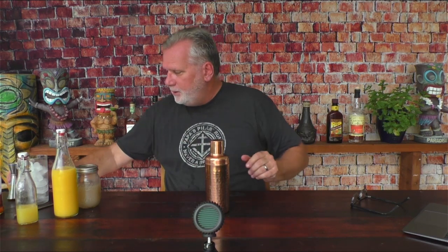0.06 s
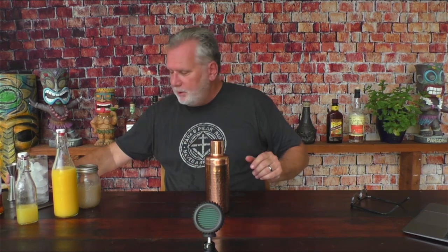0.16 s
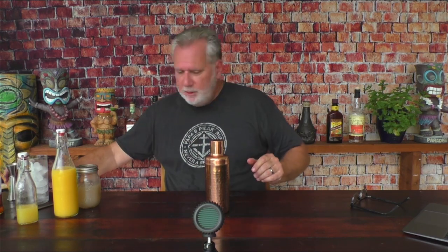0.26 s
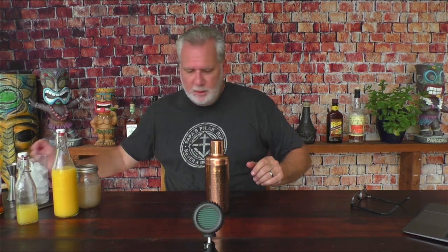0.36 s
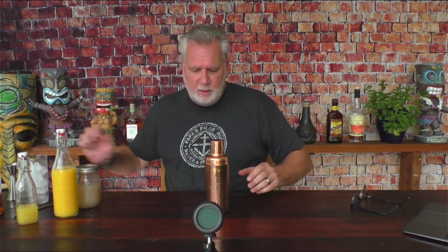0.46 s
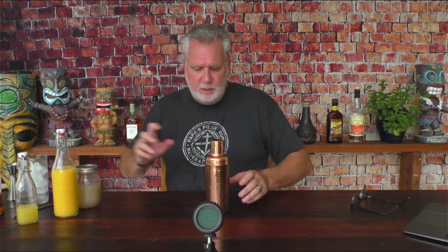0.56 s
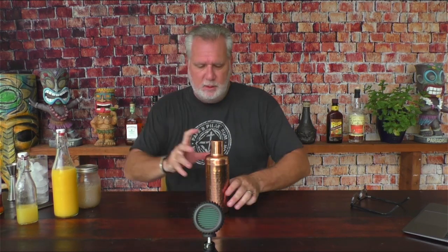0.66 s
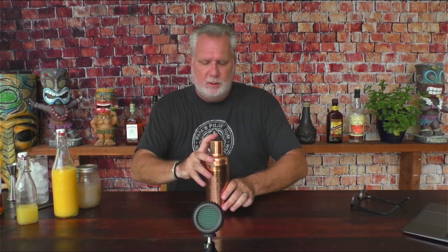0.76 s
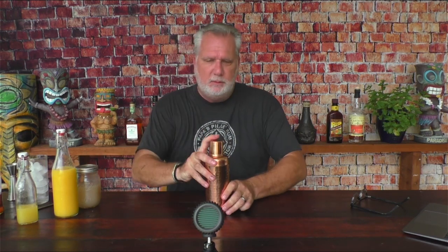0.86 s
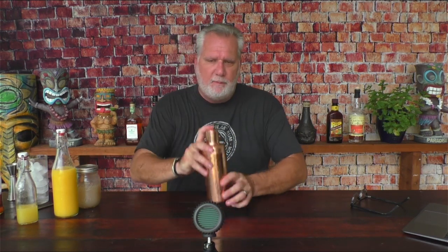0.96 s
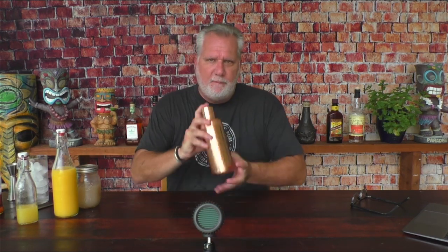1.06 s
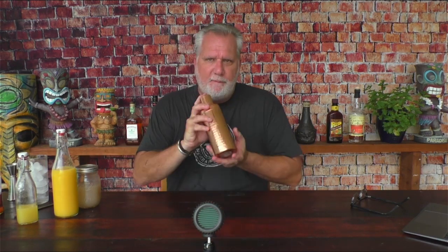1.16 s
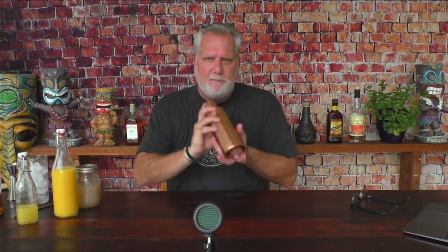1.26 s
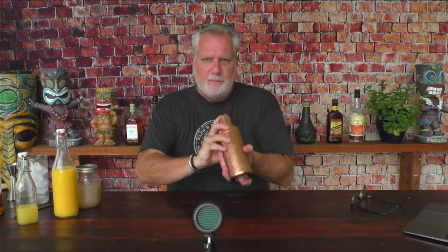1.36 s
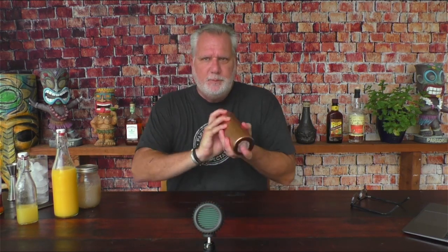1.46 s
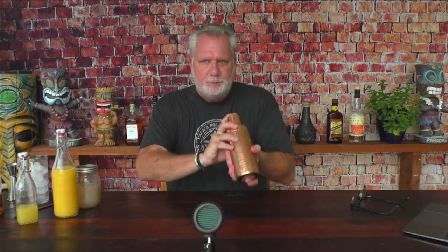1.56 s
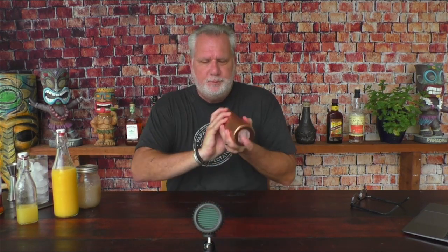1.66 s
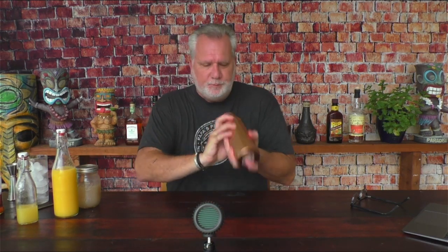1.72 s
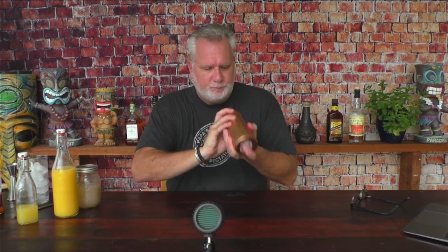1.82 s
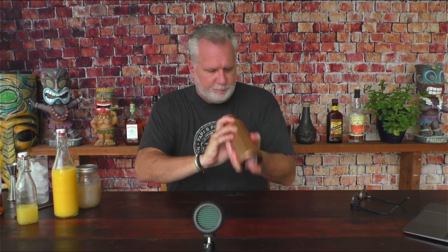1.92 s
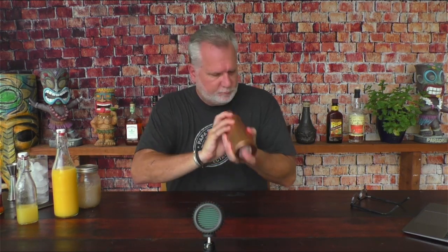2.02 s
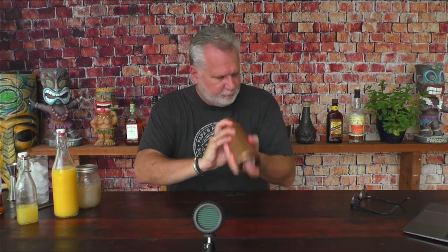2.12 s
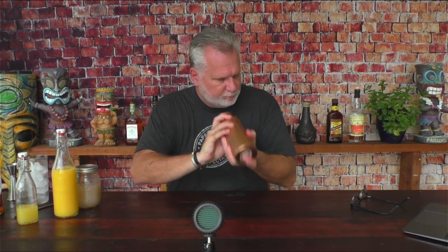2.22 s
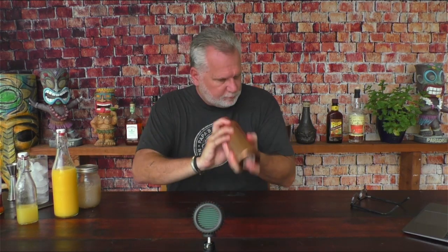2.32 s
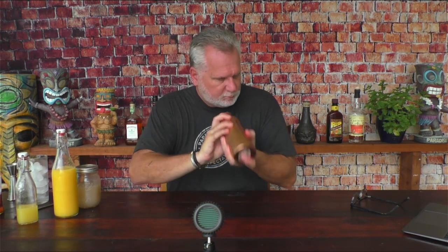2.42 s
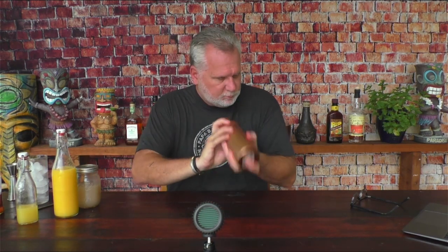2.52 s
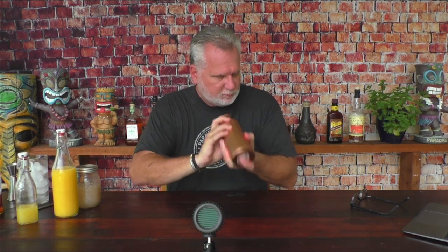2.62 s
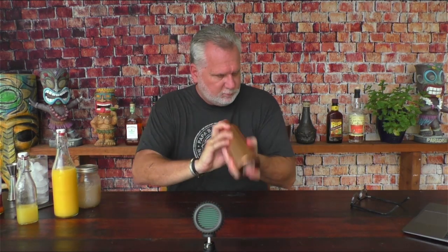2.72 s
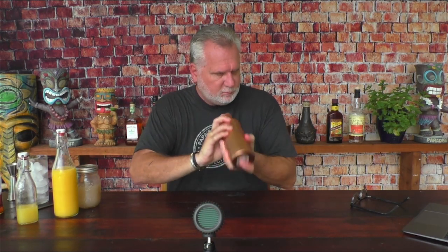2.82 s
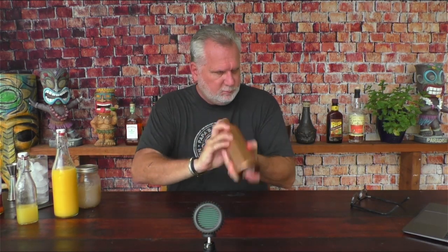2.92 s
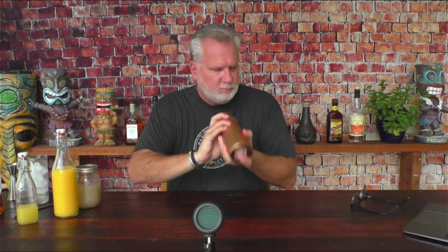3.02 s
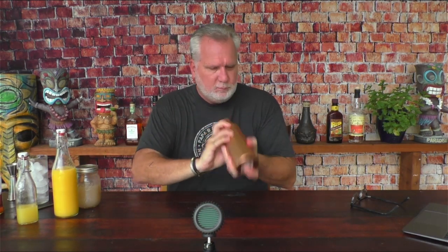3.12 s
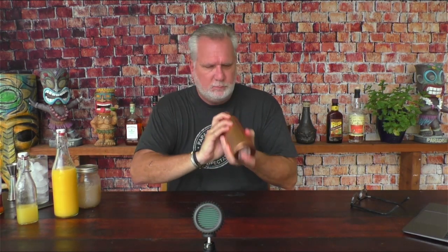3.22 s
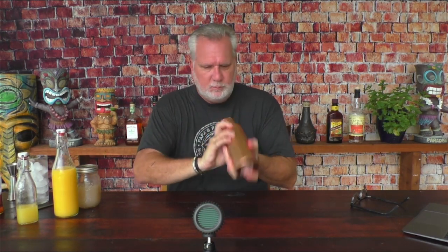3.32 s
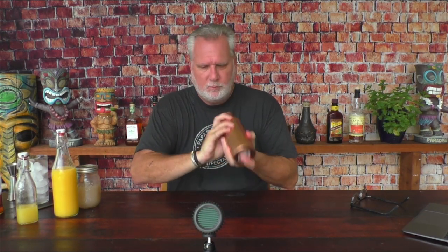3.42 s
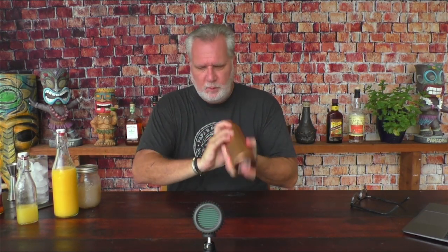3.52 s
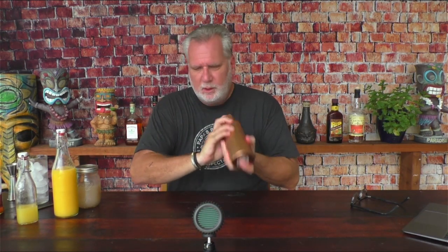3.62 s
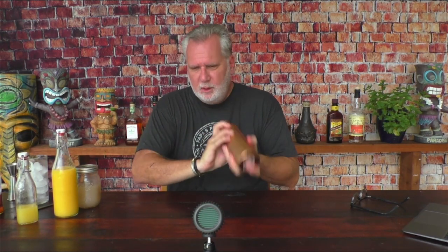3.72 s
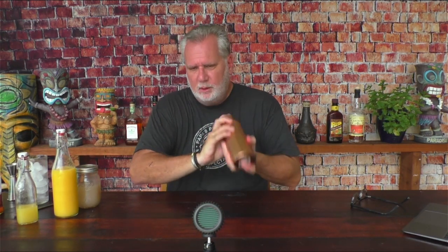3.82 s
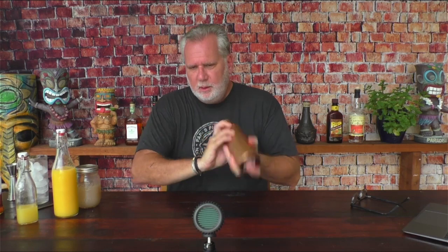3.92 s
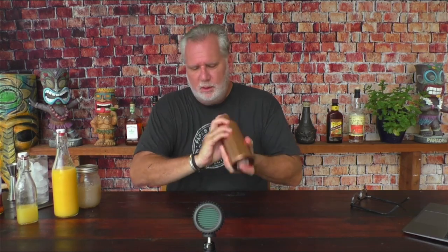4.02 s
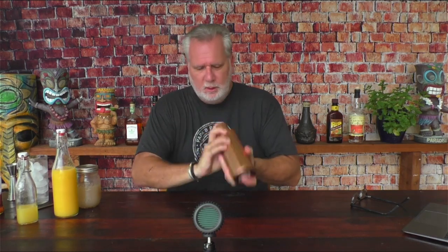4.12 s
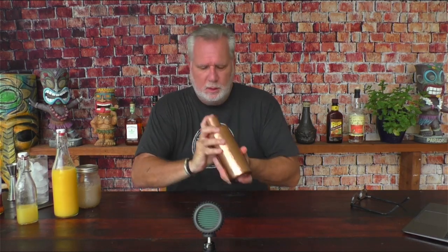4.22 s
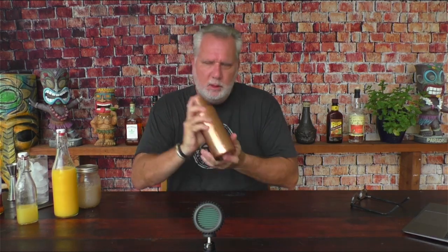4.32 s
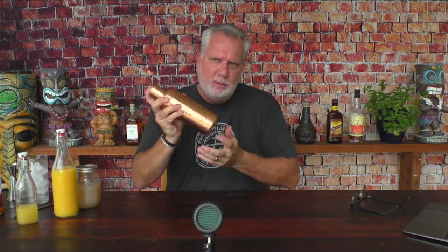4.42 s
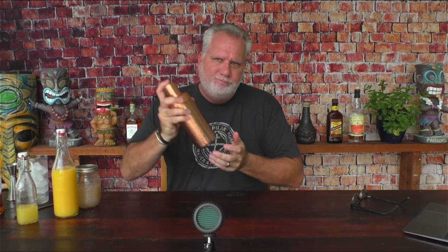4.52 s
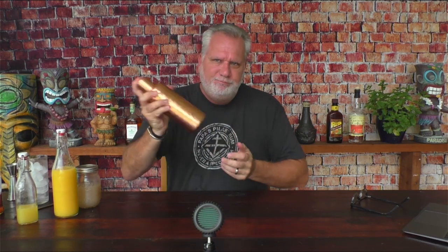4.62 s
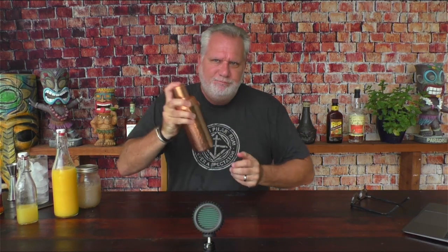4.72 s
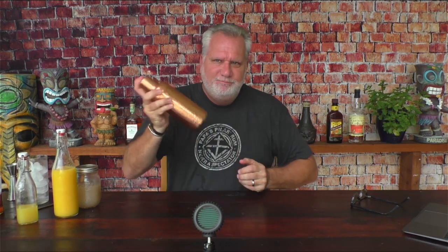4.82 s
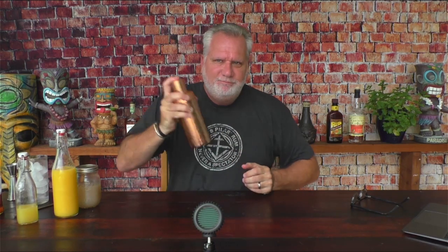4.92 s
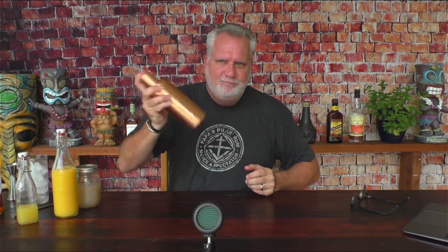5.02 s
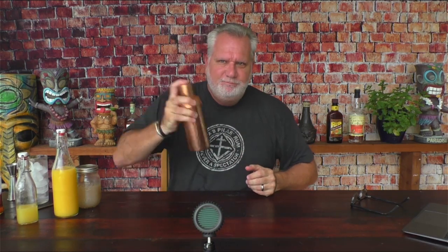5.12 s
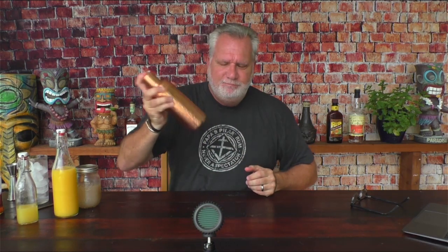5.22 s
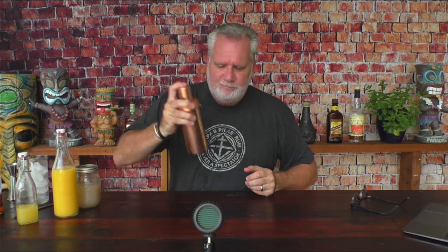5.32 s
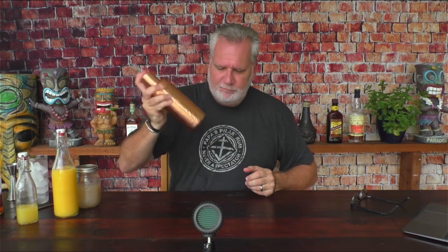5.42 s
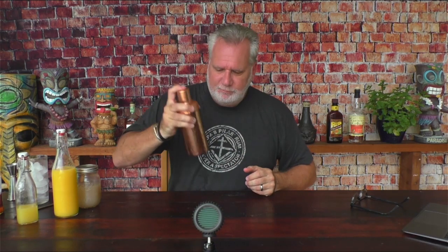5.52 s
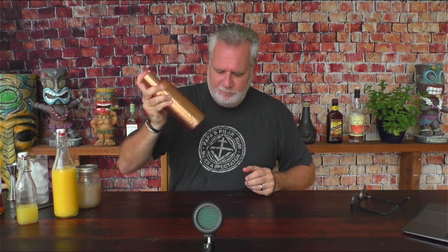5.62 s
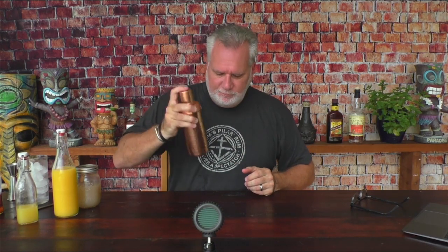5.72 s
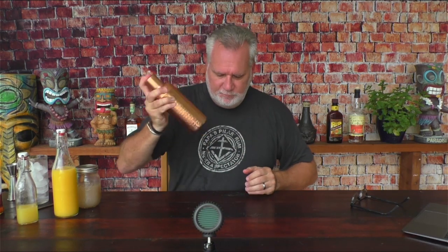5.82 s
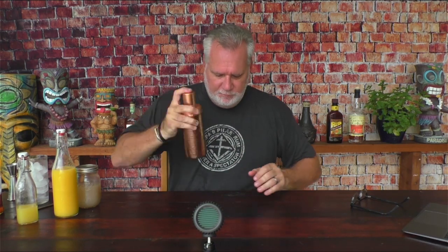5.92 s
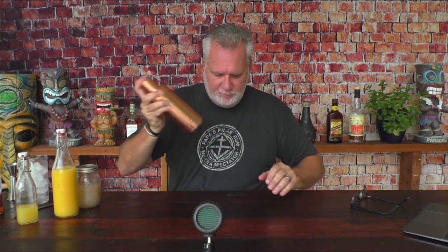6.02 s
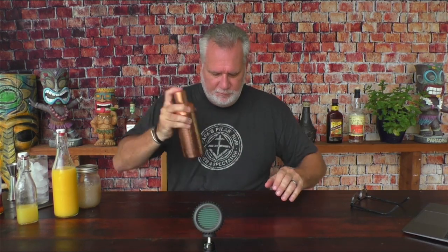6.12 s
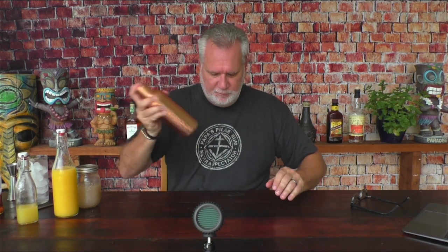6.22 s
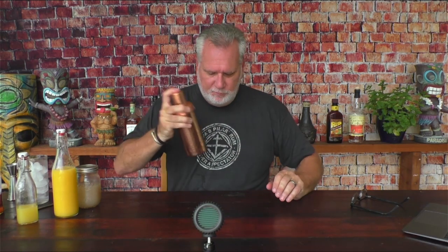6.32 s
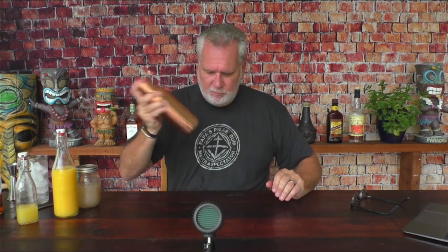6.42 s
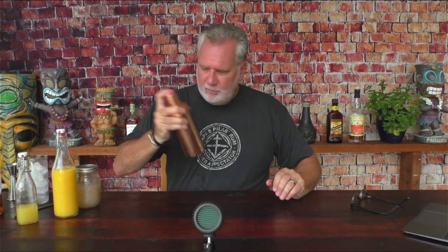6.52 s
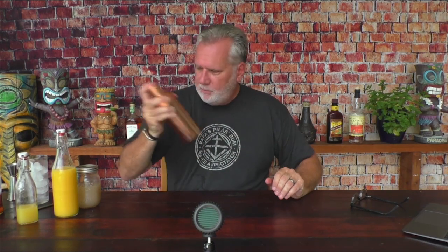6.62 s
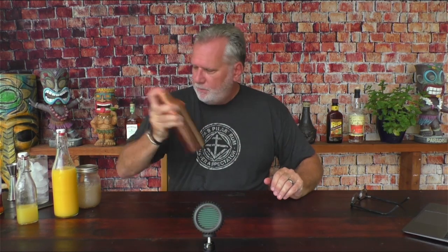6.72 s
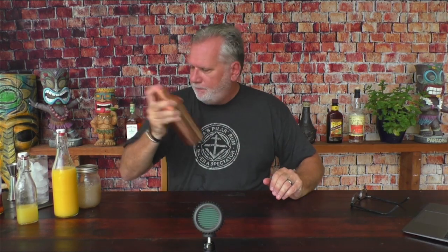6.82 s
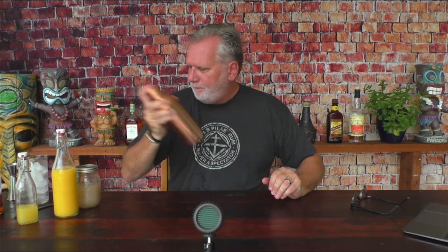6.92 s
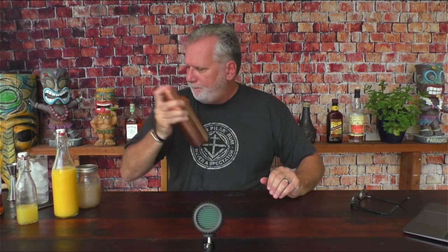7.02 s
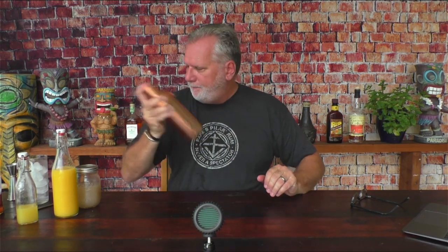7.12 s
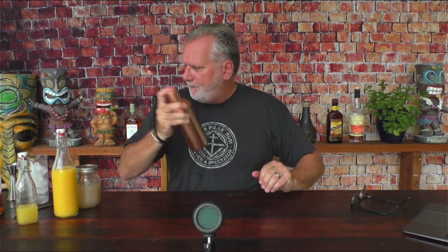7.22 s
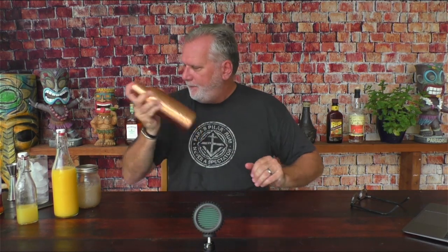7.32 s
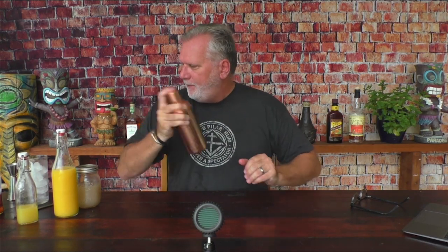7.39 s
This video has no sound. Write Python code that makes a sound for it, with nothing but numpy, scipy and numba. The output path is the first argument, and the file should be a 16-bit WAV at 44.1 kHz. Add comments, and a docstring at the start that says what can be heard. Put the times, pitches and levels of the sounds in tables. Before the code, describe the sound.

In a small, dry home bar with faint mains hum, a jar knocks on the wooden counter and the top rumbles under leaning arms. Then a metal cocktail shaker is shaken hard with both hands: ice cubes clack, liquid rushes, hollow thuds mark each throw. After a tiny slackening the shaking goes on in one hand, looser and duller, to the end. Close, clear microphone on the bar.

```python
"""A jar knocks on a wooden bar over faint mains hum, then a deep shudder swells and fades. Ice and liquid are
then shaken hard in a metal cocktail shaker, first in two hands, then in one. About ten times a second the load
lands in an end of the tin: noise and showers of pings make the rush, short rings and cracks make the cubes,
gliding tones make the gulps, and decaying tones make the thuds. A short, dull tail of noise makes the small,
dry room."""
import sys
import numpy as np
from scipy import signal
from scipy.fft import rfft, irfft
from scipy.io import wavfile
from scipy.ndimage import uniform_filter1d
from numba import njit

SR = 44100
rng = np.random.default_rng(int(sys.argv[2]) if len(sys.argv) > 2 else 0)


def wrap_up_sound(samples):
    """Save the sound to the file named by the first command line argument, as 16-bit audio."""
    columns = np.atleast_2d(samples).T
    # keep every value between -1 and 1, then stretch to whole-number steps
    tamed = np.clip(columns, -1, 1)
    steps = np.round(tamed * 32767).astype(np.int16)
    wavfile.write(sys.argv[1], SR, steps)


N = 328798
TIME = np.arange(N) / SR


def undb(db):
    """Turn decibels into gain."""
    return 10 ** (np.asarray(db) / 20)


def unit(x):
    """Scale to rms 1."""
    return x / np.sqrt(np.mean(x ** 2) + 1e-18)


def fade(t, t60):
    """Die away exponentially, 60 dB down after t60 seconds."""
    return np.exp(-np.log(1000) * t / t60)


def add(out, s, x):
    """Mix x into out from time s, in seconds."""
    i = max(int(s * SR), 0)
    out[i:i + len(x)] += x[:max(N - i, 0)]


def colour(x, points, modes=()):
    """Filter by a smooth spectrum and a few resonances, never ahead of time; white noise keeps its power."""
    size = 8192
    f = np.maximum(np.arange(size // 2 + 1) * SR / size, 1)
    hz, db = np.transpose(points)
    gain = undb(np.interp(np.log(f), np.log(hz), db))
    resonance = sum(undb(d) / (1 + (2 * (f - c) / w) ** 2) for c, w, d in modes)
    gain = gain * (1 + resonance)
    # folding the cepstrum puts the filter's energy as early as possible (minimum phase)
    cepstrum = irfft(np.log(unit(gain)))
    cepstrum[1:size // 2] *= 2
    cepstrum[size // 2 + 1:] = 0
    impulse = irfft(np.exp(rfft(cepstrum)))
    return signal.fftconvolve(x, impulse)[:N]


@njit
def pings(start, hz, cycles, sizes, glide):
    """Damped sines that die within their number of cycles while the pitch glides."""
    out = np.zeros(N)
    for k in range(len(start)):
        first = int(start[k])
        n, phase = int(cycles[k] * SR / hz[k]) + 2, 0.
        for i in range(min(n, N - first)):
            phase += 2 * np.pi * hz[k] * (1 + glide * i / n) / SR
            out[first + i] += sizes[k] * np.exp(-6 * i / n) * np.sin(phase)
    return out


def grains(count, low_hz, high_hz, cycles, spread_db, glide):
    """A shower of pings of uneven size with equal power per Hz."""
    when, pitch, length, size = rng.random((count, 4)).T
    hz = low_hz * (min(high_hz, .4 * SR) / low_hz) ** pitch
    sizes = hz * undb(-spread_db * np.log(np.maximum(size, .02)))
    return unit(pings(when * N, hz, cycles * (.5 + length), sizes, glide))


def struck(modes, t):
    """One blow sets off a group of decaying tones, a little different each time."""
    chance = rng.standard_normal((len(modes), 3))
    out = 0
    for (hz, db, t60), (level, tuning, phase) in zip(modes, chance):
        tone = np.sin(2 * np.pi * hz * (1 + 0.013 * tuning) * t + np.pi * phase)
        out = out + undb(db + 3.3 * level) * tone * fade(t, t60)
    return out


# mains hum: (pitch [Hz], rms level [dB])
HUM = [(60, -50.5), (120, -66)]
# colour of the quiet room: (frequency [Hz], relative level per Hz [dB])
ROOM_AIR = [(71, -30), (120, 0), (245, -8), (511, -9), (627, -13), (3280, -19), (5040, -25), (9290, -21),
            (15800, -33)]


def background():
    """Steady tones make mains hum; filtered noise makes a low rumble and faint room air."""
    hum = sum(undb(db) * np.sqrt(2) * np.sin(2 * np.pi * hz * TIME) for hz, db in HUM)
    deep = signal.butter(2, [25, 48], "bandpass", fs=SR, output="sos")
    rumble = unit(signal.sosfilt(deep, rng.standard_normal(N)))
    air = colour(rng.standard_normal(N), ROOM_AIR)
    return hum + undb(-58.5) * rumble + undb(-60) * air


# a jar, then the free hand, knock on the bar: (time [s], relative level [dB])
KNOCKS = [(.001, -35.5), (0.025, -37.5), (.07, -50), (4.729, -46), (4.88, -45), (5.04, -43.5)]
# tones of the wooden bar top: (pitch [Hz], relative level [dB], time to fall 60 dB [s])
BAR = [(81.1, 2.5, 0.94), (139.5, -3, 0.41), (195, -8, 0.17), (296, -9, 0.37), (484, -1, .12),
       (720, -9, 0.11), (885, -6, .12), (1037, -4, 0.099)]


def knocks():
    """A knock rings the wooden top, and dull noise dies away with it as the room answers."""
    out, t = np.zeros(N), TIME[:SR]
    dull_colour = [(60, 9), (200, -6.5), (600, -7.5), (1050, -12), (1400, -27), (4000, -41), (12000, -46)]
    dull = colour(rng.standard_normal(N), dull_colour)
    for s, db in KNOCKS:
        echo = undb(1.0) * dull[int(s * SR):][:len(t)] * fade(t, 0.36)
        onset = 1 - fade(t, 0.00071)
        add(out, s, undb(db - 1) * (struck(BAR, t) + echo) * onset)
    return out


# deep shudders swell and fade: (time [s], length [s], level [dB])
BUMPS = [(0.607, 0.63, -40.5), (0.695, 0.26, -39), (4.926, 0.4, -45.5), (5.418, 0.7, -46.5),
         (6.269, 0.2, -39)]


def bumps():
    """A deep shudder: a low tone with low rubbing noise swells and fades."""
    out = np.zeros(N)
    rub_colour = [(20, 9.5), (50, 19), (110, -6.0), (200, -10.0), (500, -37), (2000, -52), (10000, -83)]
    rub = colour(rng.standard_normal(N), rub_colour)
    for s, length, db in BUMPS:
        u = np.linspace(0, 1, int(length * SR))
        deep = np.sin(2 * np.pi * 36 * (s + u * length))
        shudder = deep + undb(-7.0) * rub[int(s * SR):][:len(u)]
        add(out, s, undb(db) * unit(shudder * u ** .5 * (1 - u)))
    return out


# about five shakes a second:
# (time [s], outward throw level [dB], return level [dB], return comes after [s]), levels relative
SHAKES = [(1.21, -29.5, -29.5, 0.067), (1.405, -27, -24, 0.071), (1.606, -25.5, -26.5, 0.1),
          (1.812, -28.5, -26, 0.07), (2.005, -28, -25.5, 0.088), (2.226, -27.5, -24.5, 0.072),
          (2.415, -27, -25.5, 0.092), (2.621, -27.5, -27.5, 0.07), (2.807, -28.5, -28, 0.074),
          (3.005, -33.5, -27.5, .08), (3.188, -27.5, -25.5, 0.1), (3.414, -30, -28, 0.095),
          (3.614, -28.5, -26, 0.086), (3.818, -28.5, -28.5, 0.077), (4.001, -30, -28, 0.094),
          (4.388, -31, -28.5, 0.11), (4.616, -29.5, -27, 0.056), (4.753, -26.5, -24, 0.097),
          (4.967, -28.5, -26, 0.095), (5.167, -24.5, -26.5, .106), (5.367, -27.5, -25.5, 0.094),
          (5.566, -36, -25.5, 0.11), (5.78, -32, -27, 0.09), (5.98, -29, -25.5, 0.11),
          (6.194, -25, -25, 0.11), (6.39, -25.5, -25, 0.12), (6.622, -26, -25.5, 0.11),
          (6.829, -26.5, -26.5, 0.11), (7.048, -27, -25.5, 0.1), (7.255, -27, -24.5, 0.11)]
# how each landing swells, holds and drains, outward then back:
# (treble against body [dB], rise [s], hold [s], time to fall 60 dB [s])
TWO_HAND_SWING = [(-5.5, 0.009, 0.025, 0.36), (-6.5, .012, 0.032, 0.22)]
ONE_HAND_SWING = [(-4, 0.016, 0.013, 0.26), (-8.5, 0.039, 0.013, 0.25)]
REGRIP_S = 4.3  # one hand lets go
LIQUID_LAG_S = .006  # the load trails the tin on the outward throw


def landings():
    """The load lands twice a shake, as rows of (s, level dB, treble dB, rise s, hold s, t60 s)."""
    rows = []
    for s, out_db, back_db, after in SHAKES:
        outward, back = TWO_HAND_SWING if s < REGRIP_S else ONE_HAND_SWING
        rows += [(s + LIQUID_LAG_S, out_db, *outward), (s + after, back_db, *back)]
    return rows


# the liquid keeps swirling from the lift onward: (time [s], relative level [dB])
SWIRL = [(1.135, -58), (1.17, -43.5), (1.3, -39), (4.15, -36), (4.3, -45.5), (4.38, -33.5), (7.45, -36.5)]
# slow change in the treble: (time [s], relative level [dB])
BRIGHTNESS = [(1.3, 3.5), (2.3, 0.3), (4.4, 1), (7.4, -1.1)]


def surges():
    """Each landing swells, holds and drains over the swirl; returns the levels of body and treble spray."""
    t = np.linspace(0, N / SR, N // 32)  # a coarse clock is enough for levels
    # powers add up, so levels are squared here
    body = undb(np.interp(t, *np.transpose(SWIRL))) ** 2 * (t > SWIRL[0][0])
    spray = body * undb(-7.5) ** 2
    for s, db, treble_db, rise, hold, t60 in landings():
        swell = np.exp(-(np.minimum(t - s, 0) / rise) ** 2)
        shape = swell * fade(np.maximum(t - s - hold, 0), t60)
        body = body + (undb(db) * shape) ** 2
        spray = spray + (undb(db + treble_db) * shape) ** 2
    brightness = undb(np.interp(t, *np.transpose(BRIGHTNESS)))
    return np.interp(TIME, t, np.sqrt(body)), np.interp(TIME, t, np.sqrt(spray) * brightness)


# colour of the tin in each grip: (frequency [Hz], relative level per Hz [dB])
TWO_HANDS = [(59, -65), (100, -15), (124, -17), (380, -3), (460, -4), (631, -2), (925, 0.5), (1120, -0.5),
             (1270, 0), (1710, -0.5), (2160, -2), (3370, -2.5), (5480, -7.5), (8370, -8.5), (15800, -18)]
ONE_HAND = [(59, -23), (100, -18.5), (238, -15), (490, -7.5), (659, -7.5), (925, -3), (1410, -5),
            (1940, -3), (2160, -3.5), (2720, -4.5), (4930, -9), (7370, -8.5), (9910, -15.5), (14800, -21.5),
            (15800, -45)]
# resonances of the tin and the air in it, in two hands and in one:
# (frequency [Hz], width [Hz], relative level [dB])
HELD_MODES = [(694, 72, -12), (1330, 33, 1), (1430, 60, -10), (2113, 150, -2), (2350, 70, -10),
              (3640, 58, -17), (8200, 1500, -7.5)]
FREE_MODES = [(1050, 180, -21), (1880, 110, -1), (1998, 46, -2), (2520, 340, -10), (6840, 1000, -50)]


def tin(x):
    """The tin colours what happens inside it, and its colour changes once one hand lets go."""
    free = np.clip((TIME - REGRIP_S) * 10 + .5, 0, 1)  # crosses over in 0.1 s
    return (1 - free) * colour(x, TWO_HANDS, HELD_MODES) + free * colour(x, ONE_HAND, FREE_MODES)


def crackle():
    """Small pieces of ice hit the wall: each noise burst starts sharply and crumbles away."""
    chance, size = rng.random((2, N))
    hits = chance < 210 / SR  # about 210 a second
    ticks = hits * undb(-4.5 * np.log(np.maximum(size, .1)))
    t = TIME[:SR // 12]
    crumble = fade(t, 0.0049) + undb(-8.5) * fade(t, 0.043)
    power = signal.fftconvolve(ticks ** 2, crumble ** 2)[:N]
    return unit(np.sqrt(np.abs(power)) * rng.standard_normal(N))


def slosh():
    """Bubbles, ice chips, crackle and foam noise surge with every landing, body and treble apart."""
    body, spray = surges()
    bubbles = grains(count=4200, low_hz=456.0, high_hz=3556, cycles=23.6, spread_db=2.5, glide=-0.088)
    chips = grains(count=3200, low_hz=2506, high_hz=11800, cycles=19.0, spread_db=4.0, glide=0.)
    foam = rng.standard_normal(N)
    mix = undb(-11.5) * bubbles + undb(-6.5) * chips + undb(-1) * crackle() + undb(-6.0) * foam
    inside = tin(mix)
    low = signal.sosfiltfilt(signal.butter(2, 3800, fs=SR, output="sos"), inside)
    return undb(-0.96) * body * unit(low) + undb(-1.34) * spray * unit(inside - low)


# large air pockets gulp in the liquid:
# (time [s], start pitch [Hz], end pitch [Hz], length [s], relative level [dB])
GULPS = [(1.15, 654, 743, 0.11, -50.5), (1.609, 241, 189, 0.042, -37), (2.295, 852, 700, 0.024, -27.5),
         (4.435, 957, 915, 0.018, -27), (4.811, 1010, 680, .07, -33), (5.216, 970, 765, 0.033, -33.5),
         (5.391, 1044, 698, 0.06, -30.5), (5.453, 675, 470, 0.027, -32.5), (6.226, 1184, 1330, .023, -28.5),
         (6.908, 890, 860, .012, -28), (6.098, 970, 860, 0.0058, -22), (6.504, 1190, 1273, .04, -29),
         (6.696, 1040, 930, .014, -23.5), (7.127, 1142, 1270, 0.046, -32)]


def gulps():
    """Larger air pockets ring unsteadily and glide as they change size."""
    out = np.zeros(N)
    for s, start_hz, end_hz, length, db in GULPS:
        u = np.linspace(0, 1, int(length * SR))
        waver = unit(uniform_filter1d(rng.standard_normal(len(u)), size=100))
        hz = (start_hz + (end_hz - start_hz) * u) * (1 + 0.041 * waver)
        tone = np.sin(2 * np.pi * np.cumsum(hz) / SR)
        add(out, s, undb(db - 0.5) * unit(tone * u ** 0.39 * (1 - u)))
    return out


RATTLE_DB, RATTLE_SPREAD_DB = -3, 1.5  # against the landing, and scatter
RATTLE_WINDOW_S, RATTLE_LEAD_S = .07, .015  # the window opens just before the landing
RATTLE_HELD_HZ, RATTLE_FREE_HZ, RATTLE_OCTAVES = 3100, 2220, 0.415  # middle pitch by grip, scatter


def rattle(count):
    """A few lesser cubes arrive at random around each landing, as rows of (s, level dB, ring Hz)."""
    rows = []
    for s, db, *_ in landings():
        centre = RATTLE_HELD_HZ if s < REGRIP_S else RATTLE_FREE_HZ
        for late, (size, pitch) in zip(rng.random(count), rng.standard_normal((count, 2))):
            when = s - RATTLE_LEAD_S + RATTLE_WINDOW_S * late
            level_db = db + RATTLE_DB + RATTLE_SPREAD_DB * size
            hz = min(centre * 2 ** (RATTLE_OCTAVES * pitch), SR / 4)
            rows.append((when, level_db, hz))
    return rows


# in two hands one cube stands out at each landing, outward then back:
# (level against that landing [dB], ring pitch [Hz])
LEAD_CUBES = [(1.5, 1090), (2, 4000)]


def lead_cubes():
    """One strong cube strikes at each two-handed landing, as rows of (s, level dB, ring Hz)."""
    rows = []
    for (s, db, *_), (lift_db, hz) in zip(landings(), LEAD_CUBES * len(SHAKES)):
        if s < REGRIP_S:
            rows.append((s, db + lift_db, hz))
    return rows


# the loudest strikes of single cubes on the wall, led by a soft tick as the shaker is picked up: (time [s],
# relative level [dB], ring pitch [Hz])
CLACKS = [(1.195, -25.5, 5150), (1.216, -19, 2440), (1.272, -22.5, 2600), (1.292, -14.5, 3630),
          (1.438, -15, 3700), (1.48, -14.5, 7600), (1.706, -15.5, 2200), (1.896, -14.5, 3930),
          (2.081, -19.5, 3690), (2.237, -18, 2500), (2.302, -19, 7100), (2.724, -20, 2800),
          (3.185, -24.5, 1075), (3.269, -19, 3570), (3.321, -16, 2780), (3.442, -20, 2180),
          (3.53, -19, 3610), (4.233, -35, 2230), (4.406, -20.5, 1840), (4.629, -19.5, 2700),
          (4.785, -19.5, 1950), (4.858, -17.5, 2180), (4.957, -20, 7100), (4.979, -18, 2220),
          (5.118, -22, 4070), (5.146, -18, 3870), (5.172, -10.5, 6960), (5.374, -21.5, 3600),
          (5.791, -23, 1870), (5.997, -19, 7000), (6.381, -16, 2200), (6.698, -24, 1220),
          (6.953, -20, 3000), (7.067, -15.5, 2550), (7.13, -23, 1360), (7.253, -18.5, 2250)]


def cubes():
    """Each cube gives a short ring of its own and a crack of noise that sounds the tin."""
    rings, cracks = np.zeros(N), np.zeros(N)
    t = TIME[:SR // 25]
    for s, db, hz in CLACKS + lead_cubes() + rattle(count=2):
        # hard contacts ring higher and shorter; their cracks are louder and linger
        hardness = np.log2(hz / 3000)
        ring = np.sin(2 * np.pi * hz * t) * fade(t, 0.0078 * 1.66 ** -hardness)
        decay = fade(t, 0.013 * 0.76 ** -hardness) + undb(-22.5) * fade(t, 0.063)
        crack = rng.standard_normal(len(t)) * decay
        # light pieces cannot move the tin at low pitch
        crack = signal.sosfilt(signal.butter(2, 0.35 * hz, "highpass", fs=SR, output="sos"), crack)
        add(rings, s, undb(db + 0.81 * hardness) * ring)
        add(cracks, s, undb(db + 0.97 * hardness) * crack)
    return undb(7.5) * rings + undb(1.0) * tin(cracks) + undb(-12.5) * cracks


# hollow ring of the tin's end: (pitch [Hz], relative level [dB], time to fall 60 dB [s])
TIN_END = [(130, -29, 0.4), (170, -25, 0.25), (299, 0, 0.069), (400, -8, 0.073), (458, 3, 0.062),
           (547, 0, 0.06), (816, -1, 0.04), (1190, -10, .045)]
USUAL_DB = -27  # an average throw
THUD_DB, THUD_PER_DB, THUD_SPREAD_DB = -30.5, 1.3, .8  # at a usual throw, growth with force, scatter


def thuds():
    """In two hands each outward throw hits the end of the tin; the liquid cushions it to a hollow thud."""
    out, t = np.zeros(N), TIME[:SR // 5]
    for s, db, *_ in SHAKES:
        if s < REGRIP_S:
            level_db = THUD_DB + THUD_PER_DB * (db - USUAL_DB) + THUD_SPREAD_DB * rng.standard_normal()
            cushion = 1 - fade(t, 0.011)
            add(out, s, undb(level_db) * struck(TIN_END, t) * cushion)
    return out


def room(x):
    """The small room answers after 3 ms with a short, dull tail of decaying noise."""
    t = TIME[:SR // 2]
    tail = rng.standard_normal(len(t)) * fade(t, 0.2) * (t > .003)
    tail = signal.sosfilt(signal.butter(1, 5000, fs=SR, output="sos"), tail)
    return x + undb(-17.5) * signal.fftconvolve(x, tail / np.linalg.norm(tail))[:N]


def scene():
    """The shaker sounds in the room, over the bar and the hum."""
    shaker = slosh() + gulps() + cubes() + thuds()
    return (background() + knocks() + bumps() + room(shaker))[None]


def record(dry):
    """Full scale caps the peaks, then a steep filter cuts everything above 16 kHz."""
    top_cut = signal.ellip(10, .2, 70, 16000, fs=SR, output="sos")
    return signal.sosfilt(top_cut, np.clip(dry, -1, 1))


dry = scene()
out = record(dry)
wrap_up_sound(out)
```